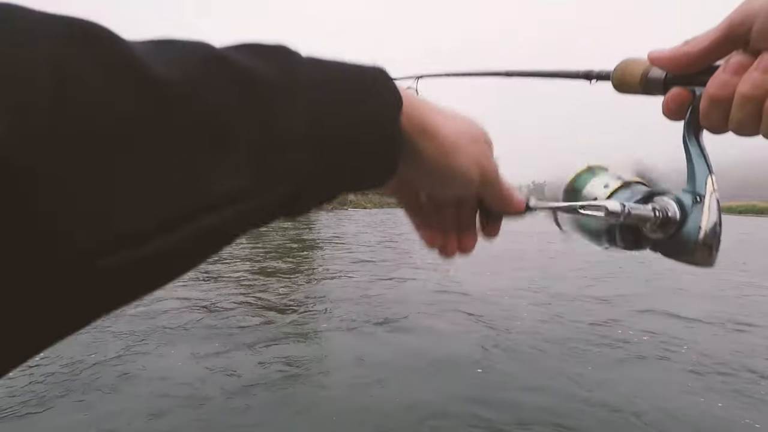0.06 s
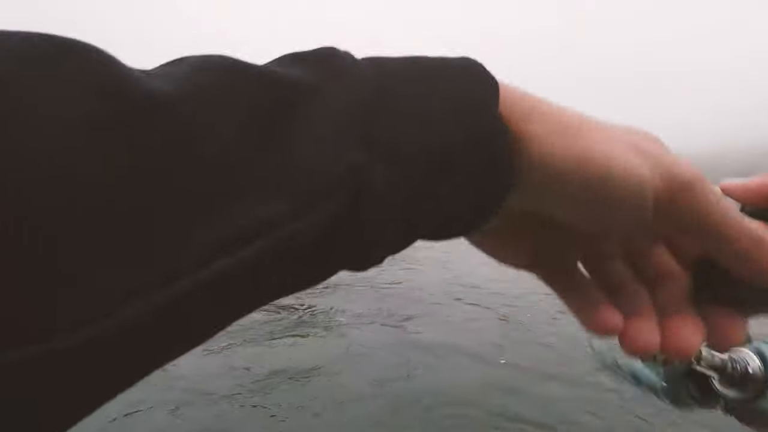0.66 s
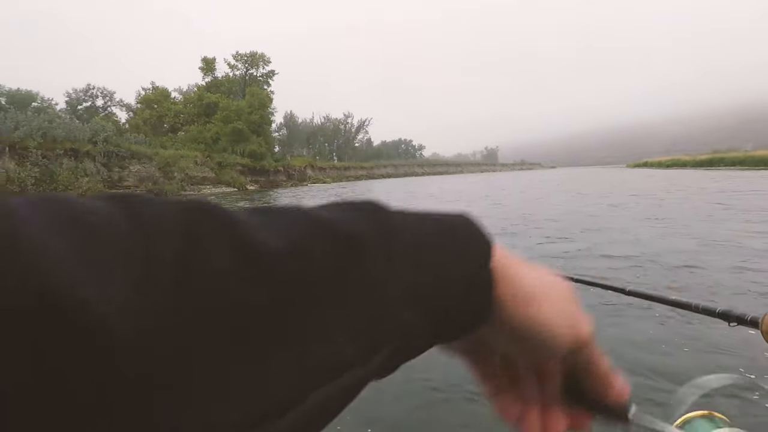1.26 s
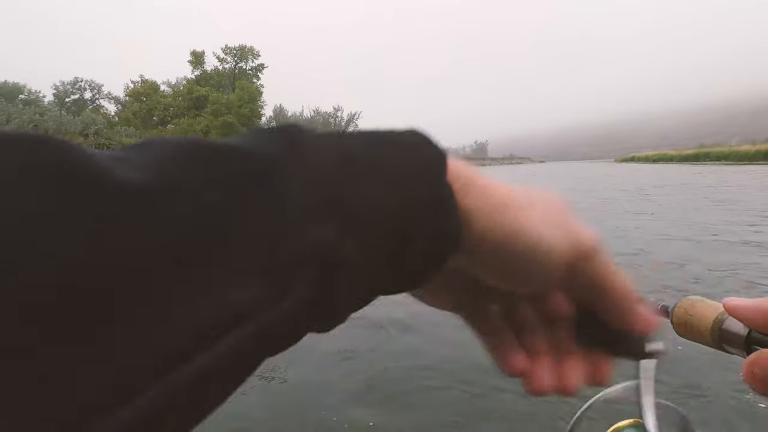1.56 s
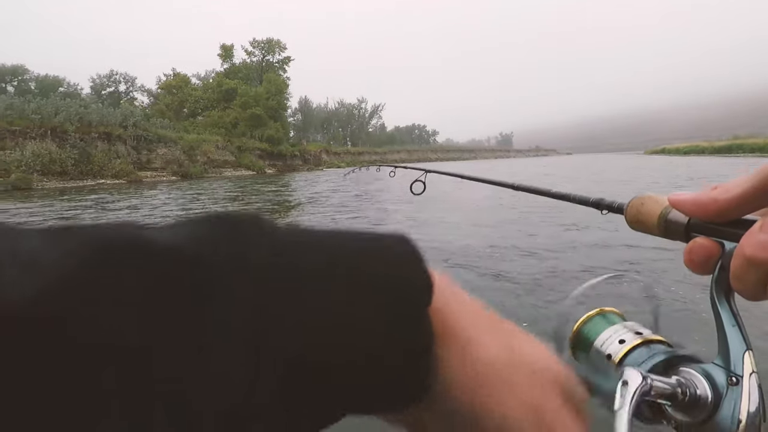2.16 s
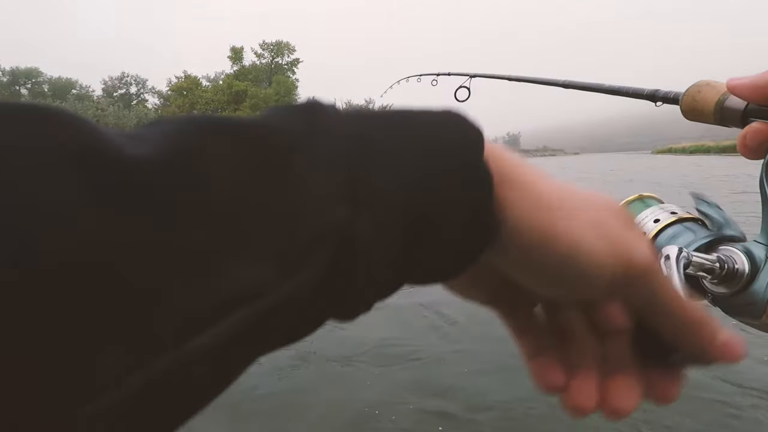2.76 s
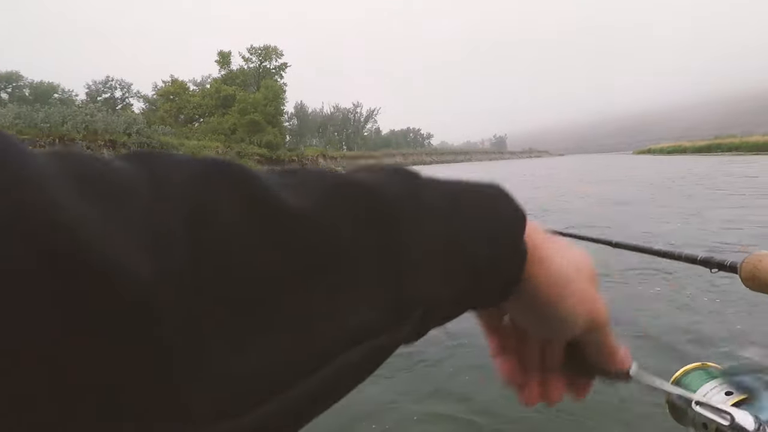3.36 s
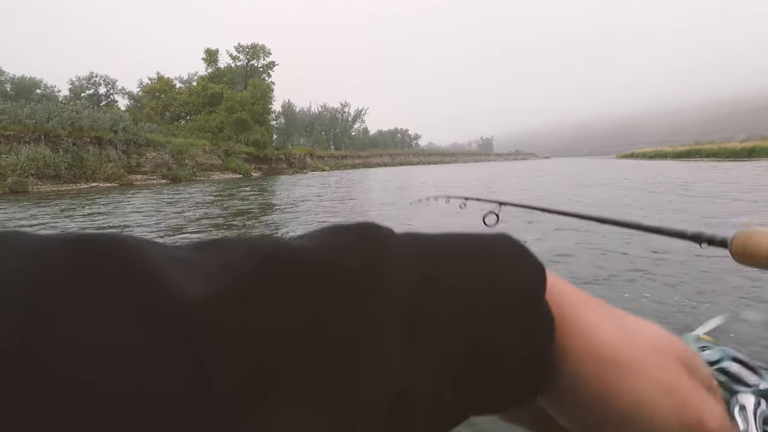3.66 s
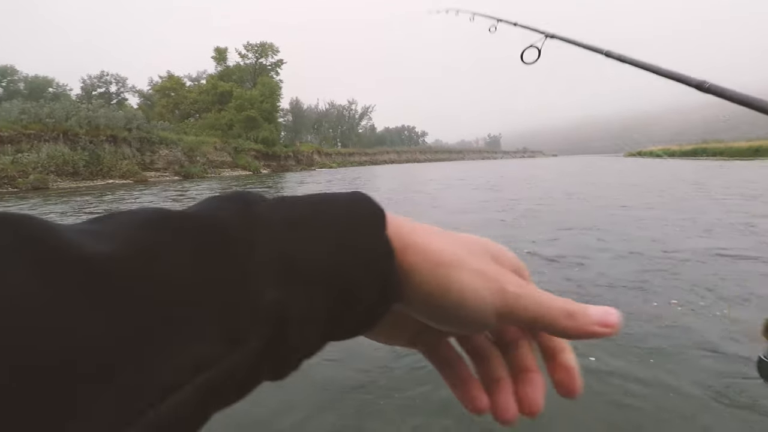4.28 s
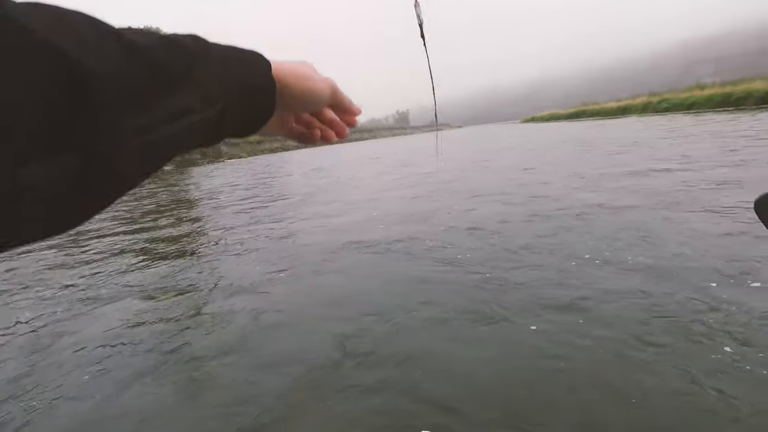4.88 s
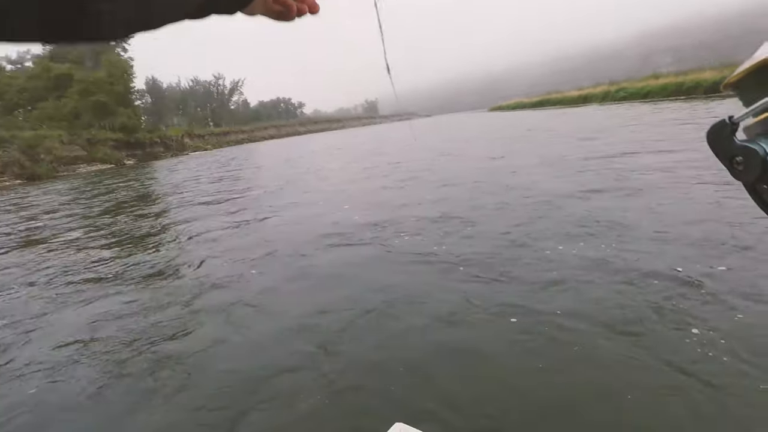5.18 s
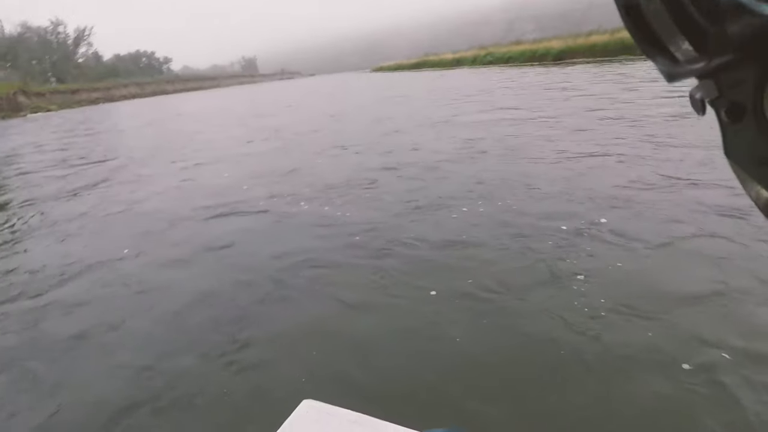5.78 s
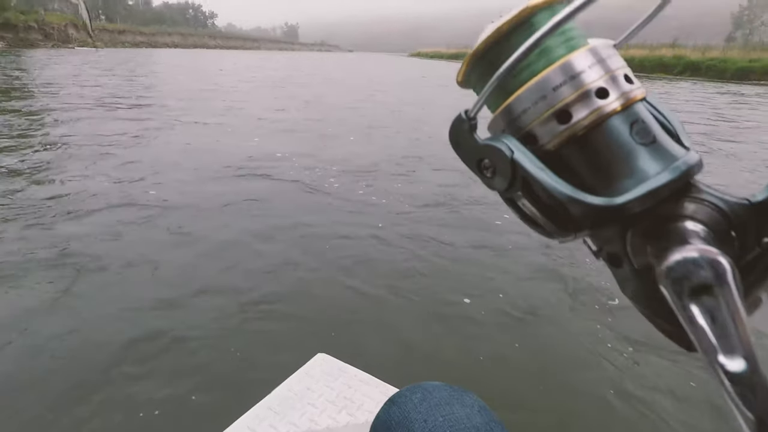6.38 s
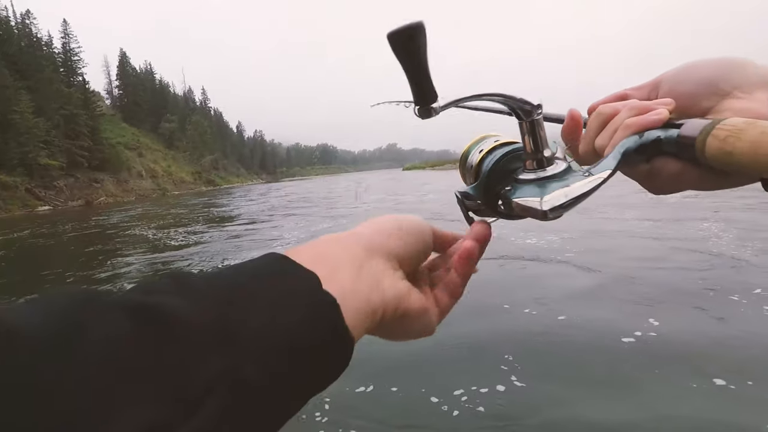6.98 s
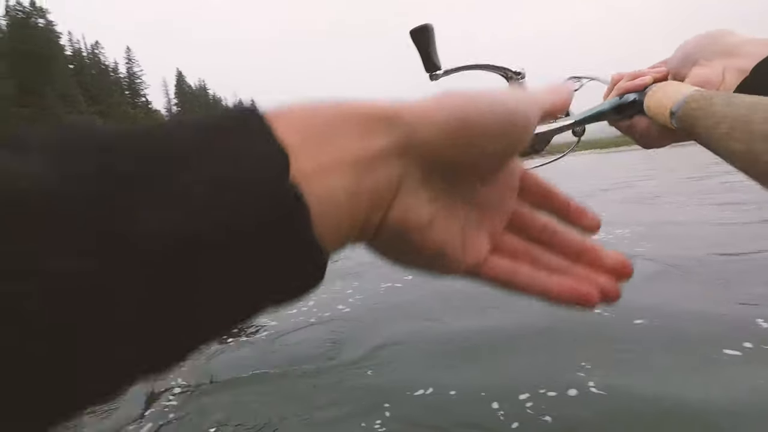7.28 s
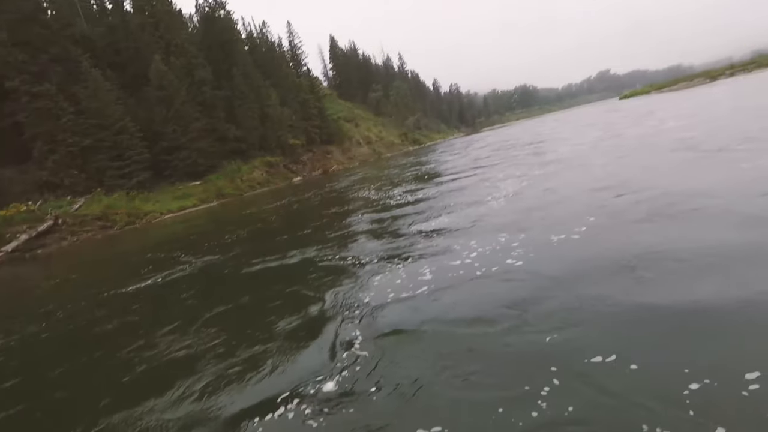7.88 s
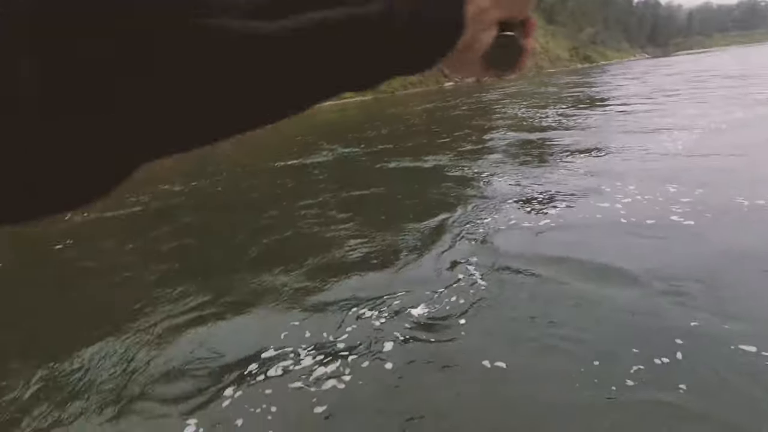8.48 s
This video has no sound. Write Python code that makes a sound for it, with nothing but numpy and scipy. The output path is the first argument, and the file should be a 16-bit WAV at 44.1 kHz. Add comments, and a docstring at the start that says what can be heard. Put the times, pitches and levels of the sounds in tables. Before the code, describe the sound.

Heard close from an angler's chest on a river, a spinning reel winds in soft surges over a slow motor hum, hollow water slaps and wind. The winding stops with a tiny squeak, and cloth scrapes and bumps the microphone while a faint bird calls. After a sudden change to quieter drifting without the motor, there is a sharp metallic snap, then a quick swish with fizzing line and a dull knock.

```python
"""A slow motor drones through the hull of a small fishing boat and speeds up a little, heard from a camera
worn on the angler's chest. Water booms and slaps on the hull, wind buffets the microphones and a far bird
whistles. A spinning reel whirrs turn by turn while a jacket rubs and taps the camera. In a second scene,
in mono, the boat drifts: the bail snaps shut, the rod swishes in a cast and the arm knocks the camera."""
import sys
import numpy as np
from scipy import signal
from scipy.fft import rfft, irfft
from scipy.io import wavfile
from scipy.ndimage import uniform_filter1d

SR = 44100
rng = np.random.default_rng(int(sys.argv[2]) if len(sys.argv) > 2 else 0)


def bounce(signal):
    """Save signal as a 16-bit WAV file at the path given by the first command-line argument."""
    frames = np.transpose(np.atleast_2d(signal))
    limited = np.clip(frames, -1, 1)
    pcm = np.round(limited * 32767).astype(np.int16)
    wavfile.write(sys.argv[1], SR, pcm)


N = 381024
TIME = np.arange(N) / SR
DRIFT_START_S = 6.7485  # the second scene begins


def amp(db):
    """Decibels to gain."""
    return 10 ** (np.asarray(db) / 20)


def unit(x):
    """Scale to rms 1."""
    return x / np.sqrt(np.mean(x ** 2))


def curve(points):
    """An automation line through (time, value) points."""
    return np.interp(TIME, *np.transpose(points))


def gate(start, end, fade):
    """Open between two times, with sloping edges."""
    return np.clip(np.minimum(TIME - start, end - TIME) / fade + .5, 0, 1)


def swell(centre_s, half_s):
    """A smooth rise and fall around a time."""
    return np.exp(-((TIME - centre_s) / half_s) ** 2)


def wander(rate_hz):
    """A random modulator, rms 1."""
    step = max(int(SR / rate_hz), 1)
    held = np.repeat(rng.standard_normal(N // step + 2), step)
    return unit(uniform_filter1d(held, step)[:N])


def grains(per_second, spread_db, decay_s):
    """Envelope of a stream of tiny random ticks, rms 1."""
    ticks = (rng.random(N) < per_second / SR) * amp(spread_db * rng.uniform(-1.1, 1, N))
    energy = signal.lfilter([1], [1, -np.exp(-2 / (decay_s * SR))], ticks ** 2 + 1e-12)
    return unit(np.sqrt(energy))


def cut(x, hz, kind, order=3):
    """A low-pass or high-pass."""
    return signal.sosfilt(signal.butter(order, hz, kind, fs=SR, output="sos"), x)


def resonate(x, hz, width):
    """One resonance, gain 1 at its centre."""
    return signal.lfilter(*signal.iirpeak(hz, hz / width, fs=SR), x)


def band(x, hz, width):
    """The same resonance twice, for steeper skirts."""
    return resonate(resonate(x, hz, width), hz, width)


def ring(hz, t60, t):
    """A struck mode."""
    return np.sin(2 * np.pi * hz * t) * np.exp(-np.log(1000) * t / t60)


def add(out, start, sound):
    """Mix a short sound in at a time in seconds."""
    i = int(max(start, 0) * SR)
    part = out[..., i:i + sound.shape[-1]]
    part += sound[..., :part.shape[-1]]


def pan_right(db):
    """Stereo gains that put the right side this far above the left."""
    return amp(np.array([[-db], [db]]) / 2)


# Stereo image of the noise layers. Each row: frequency in Hz, left-right correlation.
STEREO_IMAGE = [(30, 0.11), (70, 0.18), (130, 1), (220, 0.82), (450, 0.31), (590, -0.13), (900, -0.52),
                (1800, -0.21), (2200, -0.14), (3800, 0.67), (5000, .1), (6200, 0.46), (7800, -.4),
                (9500, 0.012)]


def noise(spectrum):
    """Coloured stereo noise whose mid has rms 1, dying away below the spectrum's lowest point."""
    hz = np.arange(N // 2 + 1) * SR / N

    def across_spectrum(points):
        point_hz, value = np.transpose(points)
        return np.interp(np.log(hz + 1), np.log(point_hz), value)

    gain = amp(across_spectrum(spectrum)) * np.minimum(hz / spectrum[0][0], 1) ** 4
    alike = np.clip(across_spectrum(STEREO_IMAGE), -.95, .99)
    mid = irfft(rfft(rng.standard_normal(N)) * gain, N)
    side = irfft(rfft(rng.standard_normal(N)) * gain * np.sqrt((1 - alike) / (1 + alike)), N)
    return np.array([mid + side, mid - side]) / np.std(mid)


# Water colour, under way and adrift. Each row: frequency in Hz, relative level in dB.
FLOW_EQ = [(200, -11.5), (260, -5), (330, -8.5), (450, -12.5), (600, -15.5), (850, -19.5), (1400, -25.5),
           (2100, -29), (2800, -33.5), (3900, -36), (4900, -40.5), (6000, -31.5), (7300, -38), (9500, -38),
           (11200, -41), (13200, -52), (15000, -67.5)]
DRIFT_EQ = [(45, -8), (75, 4.5), (110, -2), (150, 0.5), (200, -11), (260, -15.5), (400, -22), (680, -27),
            (1300, -35), (2200, -38), (3300, -47), (6000, -48.5), (9500, -50), (12000, -53), (15000, -81)]
# Fader for the water adrift. Each row: time in seconds, relative level in dB.
DRIFT_FADER = [(6.77, -49), (6.838, -47.5), (7.232, -49), (7.468, -46), (7.854, -49), (8.126, -46.5),
               (8.4, -45.5)]


def river(flow_db=-45.5, drift_gain_db=18, ripple_db=0.87):
    """A rippling bed of flowing water, deeper in tone beside the drifting boat."""
    running = gate(-1, DRIFT_START_S, 0.0012)
    flow = noise(FLOW_EQ) * amp(flow_db) * running
    drift = noise(DRIFT_EQ) * amp(curve(DRIFT_FADER) + drift_gain_db) * (1 - running)
    return (flow + drift) * amp(ripple_db * wander(18))


# Colour of the wind rumble. Each row: frequency in Hz, relative level in dB.
WIND_EQ = [(8, -18), (18, -6.5), (30, -1), (45, -13), (70, -12), (110, -23), (300, -41), (900, -77)]
# Buffets as the body moves. Each row: centre in seconds, half length in seconds, relative level in dB.
BUFFETS = [(5.85, 0.098, -22.5), (6.113, 0.08, -18), (6.716, 0.031, -18), (7.508, 0.059, -19),
           (8.363, 0.082, -20.5), (8.587, 0.12, -12)]


def wind(running_db=-27, adrift_db=-29.5, trim_db=-1):
    """Air rumbles on the microphones: a steady draught that swells with larger moves of the body."""
    draught = amp(np.where(TIME < DRIFT_START_S, running_db, adrift_db))
    buffet_power = sum(amp(db) ** 2 * swell(centre, half) for centre, half, db in BUFFETS)
    return noise(WIND_EQ) * np.sqrt(draught ** 2 + buffet_power) * amp(trim_db) * pan_right(4)


# Bird calls. Each row: start and length in seconds, first and last pitch in Hz, level in dB.
BIRD_CALLS = [(1.62, 0.24, 8080, 7500, -53), (2.17, 0.15, 8350, 7650, -60), (3.35, .27, 8130, 7400, -49),
              (4.332, 0.22, 7900, 7360, -45.5), (5.3, 0.28, 8350, 7520, -54.5),
              (6.52, 0.25, 8050, 7434, -55)]


def bird(late_swell=1.25, quaver_hz=75, flutter_db=2, left_gain=-0.43):
    """Thin falling whistles from the bank swell late; the left side is weaker and opposite in phase."""
    out, quaver = np.zeros(N), wander(900)
    for start, length, first_hz, last_hz, db in BIRD_CALLS:
        progress = np.linspace(0, 1, int(length * SR))
        glide = first_hz + (last_hz - first_hz) * progress
        hz = glide + quaver_hz * quaver[int(start * SR):][:len(progress)]
        envelope = np.abs(np.sin(np.pi * progress ** late_swell)) ** 0.7
        add(out, start, amp(db) * envelope * np.sin(2 * np.pi * np.cumsum(hz) / SR))
    return out * amp(flutter_db * wander(36)) * np.array([[left_gain], [1]])


def sleeve(start_s=0.42, fade_s=0.2, level_db=-48):
    """The sleeve brushes the chest once with a hollow whisper as the arm comes down."""
    whisper = unit(band(rng.standard_normal((2, N)), hz=960, width=450))
    envelope = gate(start_s, 9, .015) * np.exp(-np.maximum(TIME - start_s, 0) / fade_s)
    return whisper * amp(level_db) * envelope


# Camera shell modes. Each row: centre and width in Hz, gain in dB when pushed, gain in dB when twisted.
HOUSING_MODES = [(300, 384, -3, -9), (531, 187, 2, 3.5), (590, 180, -15, 5.5), (748, 90, -7, -3),
                 (995, 150, -34, -2), (1210, 320, -11, -18.5), (1450, 260, -23.5, -12),
                 (1910, 820, -17.5, -16.5), (2246, 710, -17.5, -12.5), (3500, 1500, -30, -55),
                 (6070, 1900, -31, -27), (8240, 2000, -36, -41)]


def housing(force, twist):
    """A push on the camera's housing moves both microphones alike; a twist moves them oppositely."""
    mid = side = 0
    for k, (hz, width, push_db, twist_db) in enumerate(HOUSING_MODES):
        pushed, twisted = (-1) ** k * band(np.array([force, twist]), hz, width)  # polarity alternates
        mid += amp(push_db) * pushed
        side += amp(twist_db) * twisted
    return np.array([mid + side, mid - side])


# Cloth strokes. Each row: start, length and rise in seconds, relative level in dB, rasp offset in dB.
CLOTH_STROKES = [(0.45, 0.1, 0.031, -48, -7), (0.735, .09, 0.044, -41.5, -3), (0.85, 0.083, .05, -41, 0),
                 (1.013, 0.11, 0.079, -42, 0), (1.175, .08, 0.033, -42.5, 3), (4.243, .25, 0.13, -37, -6),
                 (4.564, 0.066, 0.023, -40.5, -1), (4.682, 0.3, .06, -44.5, 0.5),
                 (4.952, 0.21, 0.057, -39, -1.5), (5.151, .37, 0.12, -40.5, 3.5),
                 (5.526, 0.096, 0.038, -35.5, 2.5), (5.608, 0.11, 0.036, -35, 5.5),
                 (5.967, 0.066, 0.044, -39.5, -0.5)]


def jacket(trim_db=1, contact_db=-46, release_s=0.02, grain_db=2, catch_db=1, rasp_hz=1600):
    """Cloth catches and slips on the housing in dense grains and drags on the mount; some strokes rasp."""
    rub = rasp = amp(contact_db) * gate(4.7, 6.1, .03)  # light contact while the arm is raised
    for start, length, rise, db, rasp_db in CLOTH_STROKES:
        release = np.exp(-np.maximum(TIME - start - length, 0) / release_s)
        press = np.clip((TIME - start) / rise, 0, 1) * release
        rub = np.maximum(rub, amp(db) * press)
        rasp = np.maximum(rasp, amp(db + rasp_db) * press)
    slips = rng.standard_normal((2, N)) * amp(grain_db * wander(350) + catch_db * wander(40))
    drag = amp(31) * rub ** 2 * unit(band(slips[0], hz=235, width=70))  # favours the firm strokes
    shell = unit(housing(*slips))
    return (cut(shell, rasp_hz, "low") * rub + cut(shell, rasp_hz, "high") * rasp + drag) * amp(trim_db)


# Taps on the camera. Each row: time in seconds, then relative levels in dB of body, tick and thud.
CAMERA_TAPS = [(0.202, -30, -46, -32), (0.572, -30.5, -57, -23), (0.83, -50, -42, -50),
               (0.88, -34, -39, -31), (0.994, -38, -40, -29), (1.062, -33, -42, -32),
               (1.217, -40, -38, -43), (1.514, -42, -44.5, -35), (1.965, -39, -41, -39),
               (2.144, -35, -52, -33), (2.164, -36, -45, -36), (3.262, -55, -38, -55),
               (3.908, -52, -52, -25), (4.105, -39.5, -39.5, -23), (4.222, -40, -35.5, -38),
               (4.252, -45, -45, -46), (4.35, -37, -45, -37), (4.418, -32, -45, -36),
               (4.719, -28.5, -47, -31), (4.789, -26, -41, -29), (4.997, -37, -40, -34),
               (5.243, -23, -37.5, -34), (5.382, -42, -50, -32), (5.587, -38, -38, -38),
               (5.739, -46, -32.5, -45)]


def taps(body_gain_db=24, tick_gain_db=19, thud_gain_db=14, push_s=0.00033, scrape_s=0.0043):
    """Each tap is a soft push and a brief scrape on the housing, with a dull thud from the mount."""
    force, mount, t = np.zeros((2, N)), np.zeros(N), TIME[:SR // 25]
    push = t / push_s * np.exp(-t / push_s)
    for time, body_db, tick_db, thud_db in CAMERA_TAPS:
        grit = unit(resonate(rng.standard_normal((2, len(t))), hz=1400, width=1300))
        scrape = grit * np.exp(-t / scrape_s)
        onset = time + 0.0011
        add(force, onset, amp(body_db + body_gain_db) * push + amp(tick_db + tick_gain_db) * scrape)
        add(mount, onset, amp(thud_db + thud_gain_db) * push)
    shell = housing(force[0], twist=amp(-2) * force[1])
    cushioned = cut(shell, 2600, "low", order=4)  # cloth softens every tap
    return cushioned + resonate(mount, hz=280, width=140)


# Sub thumps, mostly on the crank's downstrokes. Each row: centre in seconds, pitch in Hz, level in dB.
ARM_SWAYS = [(0.661, 36, -21), (0.899, 28, -24), (1.39, 29, -18), (2.08, 31, -24), (2.75, 34, -18.5),
             (2.991, 27, -21), (3.429, 28, -15), (4.15, 27, -22), (5.02, 32.4, -22)]


def arm_sway(half_s=0.047):
    """The working arm sways the camera on the chest in soft, deep thumps."""
    thumps = sum(amp(db) * swell(centre, half_s) * np.sin(2 * np.pi * hz * (TIME - centre))
                 for centre, hz, db in ARM_SWAYS)
    return thumps * pan_right(2)


# Dry clicks of reel and line guides. Each row: start in seconds, centre and width in Hz, level in dB.
TACKLE_CLICKS = [(0.2405, 5800, 1800, -38), (1.513, 5500, 4000, -47), (1.54, 6300, 2000, -38),
                 (2.807, 4800, 3500, -40), (3.205, 4200, 1900, -34), (3.2627, 4030, 5000, -39),
                 (3.5913, 4200, 3000, -43), (5.245, 7500, 4000, -45), (5.741, 1840, 1000, -30),
                 (5.7405, 8750, 3000, -40), (5.912, 7300, 1500, -45), (6.26, 3800, 900, -43),
                 (7.832, 4000, 3000, -48)]


def tackle_clicks(attack_s=0.00034, decay_s=0.0023):
    """Small parts of the tackle tick, each with its own colour and hardly any ring."""
    out, t = np.zeros((2, N)), TIME[:SR // 50]
    envelope = (1 - np.exp(-t / attack_s)) * np.exp(-t / decay_s)
    for start, hz, width, db in TACKLE_CLICKS:
        grain = unit(band(rng.standard_normal((2, len(t))), hz, width))
        add(out, start, amp(db) * grain * envelope)
    return out


def squeak(hz, length, roughness=0.04):
    """A brief, slightly rough tone of one part slipping on another."""
    count = int(length * SR)
    jitter = unit(uniform_filter1d(rng.standard_normal(count), SR // 1000))
    pitch = hz * (1 + roughness * jitter)
    return np.sin(np.linspace(0, np.pi, count)) * np.sin(2 * np.pi * np.cumsum(pitch) / SR)


# Crank handle squeaks. Each row: start in seconds, low tone level in dB, high tone level in dB.
HANDLE_SQUEAKS = [(3.44, -60, -46), (3.486, -44, -48)]
# Bail hinge chirps. Each row: start and length in seconds, pitch in Hz, level in dB.
HINGE_SQUEAKS = [(6.912, .007, 3960, -42), (6.919, .009, 3960, -41), (6.913, .015, 1980, -44),
                 (6.931, .008, 3960, -37)]


def reel_squeaks(low_hz=946, high_hz=1630, handle_s=0.017):
    """The crank handle squeaks as the winding stops, the bail's hinge as it swings."""
    out = np.zeros(N)
    for start, low_db, high_db in HANDLE_SQUEAKS:
        add(out, start, amp(low_db) * squeak(low_hz, handle_s))
        add(out, start, amp(high_db) * squeak(high_hz, handle_s))
    for start, length, hz, db in HINGE_SQUEAKS:
        add(out, start, amp(db) * squeak(hz, length))
    return out


# Gear whirr, surging roughly every three quarters of a second. Each row: time in seconds, level in dB.
GEAR_FADER = [(0.05, -50.5), (0.2, -55), (0.35, -62), (0.6, -58.5), (0.7, -53.5), (0.83, -54), (0.97, -62),
              (1.28, -52), (1.37, -66), (1.48, -53), (1.65, -50.5), (1.73, -59), (1.85, -54.5),
              (2.0, -55.5), (2.12, -57.5), (2.25, -52.5), (2.52, -52.5), (2.65, -64), (2.95, -57.5),
              (3.1, -58), (3.25, -57), (3.4, -62), (3.5, -65)]
# Gear resonance, following the hand's pace. Each row: time in seconds, pitch in Hz.
GEAR_BEND = [(0, 1690), (.13, 1740), (.55, 1739), (.66, 1598), (.73, 1700), (.82, 1653), (1.25, 1723),
             (1.45, 1671), (1.55, 1701), (1.7, 1653), (2.0, 1680), (2.25, 1654), (2.55, 1655), (3.0, 1702),
             (3.5, 1628)]
# Wet line running onto the spool. Each row: time in seconds, relative level in dB.
LINE_FADER = [(0, -58), (.12, -59), (.25, -59), (.3, -66), (.4, -65), (.45, -58), (.63, -59), (.7, -62),
              (1.05, -61.5), (1.2, -63), (1.24, -57.5), (1.33, -56.5), (1.38, -62), (1.5, -59),
              (1.68, -56.5), (1.73, -57), (1.8, -57), (1.95, -59), (2.25, -60.5), (2.35, -66), (2.9, -64),
              (3.0, -59), (3.15, -59.5), (3.4, -61.5), (3.55, -65)]
# Colours of line hiss and roller rattle. Each row: frequency in Hz, relative level in dB.
LINE_EQ = [(500, -5.5), (900, 2), (1300, 2.5), (2500, -2.5), (3900, 2), (4900, -3), (6600, -1.5),
           (7600, -1.5), (8400, -18), (11000, -20.5), (15000, -41.5)]
ROLLER_EQ = [(2800, -25), (3800, -8), (4900, -19), (5700, -1), (6600, -1.5), (7200, -5), (8200, -25),
             (12000, -39.5)]


def reel(end_s=3.53, gear_width_hz=160, tooth_grain_db=3, hiss_db=-2, hiss_grain_db=2.5, roller_db=-1):
    """The gears whirr in one bending resonance; wet line hisses and sets the roller rattling."""
    pitch = curve(GEAR_BEND)
    teeth = rng.standard_normal((2, N)) * amp(tooth_grain_db * wander(120))
    steady_whirr = unit(band(teeth, pitch.mean(), gear_width_hz))
    playhead = np.cumsum(pitch / pitch.mean())  # varispeed bends the resonance
    whirr = np.array([np.interp(playhead, np.arange(N), channel) for channel in steady_whirr])
    hiss = noise(LINE_EQ) * amp(hiss_db + hiss_grain_db * wander(140))
    rattle = noise(ROLLER_EQ) * grains(190, spread_db=8, decay_s=.0016) * amp(roller_db)
    winding = whirr * amp(curve(GEAR_FADER)) + (hiss + rattle) * amp(curve(LINE_FADER))
    return winding * gate(-1, end_s, 0.21)


# The bail shutting and bouncing. Each row: start in seconds, relative ring and crack levels in dB.
BAIL_HITS = [(6.8763, -46, -54), (6.9263, -12.5, -20), (6.9303, -38, -34), (6.9365, -24, -36)]
# Modes of wire and rotor. Each row: pitch in Hz, relative level in dB, seconds to fall by 60 dB.
BAIL_MODES = [(480, -12, .012), (820, -12, .012), (1150, -15, 0.02), (1816, -20, 0.04), (1963, -5.5, 0.045),
              (2065, -17, .04), (2500, -9, 0.0098), (3500, -16, 0.016), (3962, -23, 0.045),
              (4660, -3, 0.011), (5760, -2, 0.008), (6050, -5, .015), (7040, -25, 0.045), (9100, -18, .014)]
# Colour of the crack. Each row: frequency in Hz, relative level in dB.
CRACK_EQ = [(600, -7), (2000, -1), (2900, -7), (4600, 0), (6200, 3), (7500, -13), (9000, -9), (12000, -19),
            (15000, -19)]


def bail(ring_gain_db=-2, attack_s=.0006):
    """The sprung wire cracks onto its stop, bounces and rings with the rotor."""
    wire, contact, t = np.zeros(N), np.zeros(N), TIME[:SR // 8]
    modes = (1 - np.exp(-t / attack_s)) * sum(amp(db) * ring(hz, t60, t) for hz, db, t60 in BAIL_MODES)
    spike = np.exp(-((t - .0009) / .0008) ** 2)
    tail = .28 * (1 - np.exp(-t / .001)) * np.exp(-t / .004)
    for start, ring_db, crack_db in BAIL_HITS:
        add(wire, start, amp(ring_db + ring_gain_db) * modes)
        add(contact, start, amp(crack_db) * (spike + tail))
    return wire + noise(CRACK_EQ) * contact


# Faders for the cast's swish and the line's fizz. Each row: time in seconds, relative level in dB.
SWISH_FADER = [(8.2, -71), (8.32, -49), (8.39, -63), (8.435, -51), (8.458, -46), (8.471, -37.5),
               (8.481, -36.5), (8.5, -40), (8.512, -52), (8.55, -46), (8.58, -61), (8.64, -77.5)]
FIZZ_FADER = [(8.3, -66), (8.44, -66), (8.449, -45), (8.458, -42), (8.472, -44), (8.48, -50), (8.5, -48),
              (8.53, -53), (8.6, -55), (8.64, -60)]
# Their colours. Each row: frequency in Hz, relative level in dB.
SWISH_EQ = [(300, 3), (700, 2.5), (1300, 0.5), (2300, 1.5), (3300, -5), (4500, -6), (6200, -10),
            (7200, -21), (9000, -16), (15000, -28)]
FIZZ_EQ = [(6500, -22), (7600, -14), (8500, 4), (10500, -5), (12000, -7), (15000, 2.5)]


def cast(flutter_db=2, fizz_gain_db=3, whirr_db=-60):
    """Sleeve and rod swish; line fizzes over the spool lip and whirrs away."""
    swish = noise(SWISH_EQ) * amp(curve(SWISH_FADER) + flutter_db * wander(200))
    coils = grains(900, spread_db=5, decay_s=.0015)
    fizz = noise(FIZZ_EQ) * coils * amp(curve(FIZZ_FADER) + fizz_gain_db)
    whirr = unit(resonate(rng.standard_normal(N), hz=4600, width=120)) * amp(whirr_db)
    return (swish + fizz) * gate(8.2, 9, 0.039) + whirr * gate(8.48, 9, .03)


# Resonances of the camera mount. Each row: centre and width in Hz, gain in dB.
MOUNT_MODES = [(167, 260, 2.5), (334, 10, -3.5), (614, 65, -2.5), (970, 150, -1)]


def arm_knock(hit_s=8.5457, force_db=-4, fall_db=1.2, gap_s=0.0029, contact_s=0.00077, softening=1.44):
    """The arm knocks the camera and chatters: four blows, ever wider apart, softer and weaker."""
    blows = np.zeros(N)
    for k in range(4):
        centre = hit_s + gap_s * (2 ** k - 1)
        half_s = contact_s * softening ** k
        pulse = signal.windows.hann(int(2 * half_s * SR) + 3)
        add(blows, centre - half_s, amp(force_db - fall_db * k) * pulse)
    return sum(amp(db) * resonate(blows, hz, width) for hz, width, db in MOUNT_MODES)


# Water slaps. Each row: start in seconds, pitch in Hz, level in dB, seconds to fall by 60 dB.
WATER_SLAPS = [(0.2, 184.3, -20.5, 0.52), (0.33, 169, -24.5, 0.3), (0.396, 159, -16, 0.15),
               (0.484, 151, -10, 0.073), (0.706, 171.3, -12.5, 0.3), (2.158, 181, -11, 0.075),
               (5.112, 143, -23, 0.38), (7.555, 201, -17, 0.075)]


def hull_slaps(attack_s=0.0015):
    """Each slap of water rings one low note in the hull."""
    out, t = np.zeros(N), TIME[:SR // 3]
    for start, hz, db, t60 in WATER_SLAPS:
        add(out, start, amp(db) * ring(hz, t60, t) * (1 - np.exp(-t / attack_s)))
    return out


# Colour of the hull's boom. Each row: frequency in Hz, relative level in dB.
HULL_EQ = [(70, -22), (108, -9.5), (140, 17.5), (165, 4), (195, 3), (240, -6.5), (400, -47)]
# Fader for the boom and the motor's ring in the hull. Each row: time in seconds, relative level in dB.
HULL_FADER = [(0.05, -26.5), (0.5, -26), (0.65, -35), (0.75, -23.5), (0.88, -29), (1.03, -27), (1.1, -28.5),
              (1.45, -29.5), (1.65, -27), (1.81, -38), (1.95, -25.5), (2.1, -29.5), (2.42, -23.5),
              (2.6, -35), (2.8, -27), (3.3, -24), (3.65, -28.5), (3.9, -23), (4.15, -30.5), (4.6, -22.5),
              (4.92, -30), (5.13, -23), (5.33, -29.5), (5.6, -28), (5.88, -35.5), (6.05, -28.5), (6.3, -27),
              (6.7, -28)]


def hull_boom(shaft_hz, cruise_hz=31.6, base_db=-33, idle_lift_db=5, adrift_db=-39, lapping_db=2):
    """The hull booms with the water, most while the motor idles, and laps softly once adrift."""
    fader_db = curve(HULL_FADER)
    idling = (cruise_hz - shaft_hz) / (cruise_hz - shaft_hz.min())
    running_db = base_db + 0.48 * (fader_db - fader_db.mean()) + idle_lift_db * idling
    running = gate(-1, DRIFT_START_S, 0.002) > 0
    return noise(HULL_EQ) * amp(np.where(running, running_db, adrift_db + lapping_db * wander(8.6)))


# Throttle, from idle to a slow cruise. Each row: time in seconds, shaft rate in Hz.
SHAFT_RATE = [(0.0, 24.8), (0.6, 24.7), (0.79, 26.2), (0.88, 27.01), (1.0, 28.7), (1.12, 30.11),
              (1.29, 31.3), (1.8, 29.8), (2.18, 29.7), (2.31, 30.4), (3.13, 30.9), (3.55, 29.7),
              (3.79, 31.2), (4.17, 30.2), (4.6, 31.6), (5.01, 29.9), (5.72, 29.9), (6.04, 31.5),
              (6.31, 30.4), (6.74, 31.1)]
# The firing note (harmonic 4), rising as the throttle opens. Each row: time in seconds, level in dB.
FIRING_FADER = [(0, -34), (.6, -30.5), (.9, -35.5), (1.1, -20.5), (1.3, -22), (1.55, -21.5), (1.72, -26.5),
                (1.82, -28.5), (1.95, -25), (2.2, -24.5), (2.65, -23.5), (2.85, -21.5), (3.3, -22.5),
                (3.6, -21.5), (3.85, -22), (4.2, -24.5), (4.6, -21.5), (4.95, -24), (5.25, -22),
                (5.55, -24), (5.85, -23), (6.1, -22.5), (6.45, -23), (6.7, -23)]
# Hull ring on harmonics 5 and 6. Each row: frequency in Hz, offset from the hull fader in dB.
HULL_RING_EQ = [(122, -6.5), (137, 13), (149, 0.5), (157, -1), (180, -14.5)]
# The weaker harmonics. Each row: frequency in Hz, level in dB.
WEAK_HARMONIC_EQ = [(25, -49), (50, -33.5), (61, -33), (75, -29.5), (91, -35), (150, -30), (175, -49),
                    (212, -51.5), (280, -58.5)]


def motor(shaft_hz, hull_hz=135, hull_width_hz=45, low_lag_s=0.0035, throb_db=0.8):
    """Harmonics of the shaft rate drone in the hull, wavering as the propeller meets uneven water."""
    levels_db = {4: curve(FIRING_FADER) + 1.4 * wander(14)}
    for k in (5, 6):
        ring_db = np.interp(k * shaft_hz, *np.transpose(HULL_RING_EQ))
        levels_db[k] = curve(HULL_FADER) + ring_db + 2.04 * wander(14)
    for k in (1, 2, 3, 7, 8):
        levels_db[k] = np.interp(k * shaft_hz, *np.transpose(WEAK_HARMONIC_EQ)) + 2 * wander(8)
    shaft_phase = 2 * np.pi * np.cumsum(shaft_hz) / SR
    drone = np.zeros(N)
    for k, db in levels_db.items():
        hz = k * shaft_hz
        lag = np.arctan(2 * (hz - hull_hz) / hull_width_hz)  # the hull answers late above its resonance
        lag += 2 * np.pi * hz * low_lag_s * (k < 4)  # the slow low waves arrive late too
        wobble_rad = np.where(hz > hull_hz, .3, .14 if k == 4 else .35)  # the firing note is steadiest
        wobble = uniform_filter1d(wobble_rad, SR // 10) * wander(28)
        drone -= np.sqrt(2) * amp(db) * np.sin(k * shaft_phase - lag + wobble)
    drone *= amp(throb_db * wander(30))
    stereo = np.array([drone, np.roll(drone, 13)])  # reaches the right microphone a moment later
    return stereo * gate(-1, DRIFT_START_S, 0.002)


def scene():
    """The boat, a little to the right, with the river, the angler and the bird around it."""
    shaft_hz = curve(SHAFT_RATE)
    boat = (hull_boom(shaft_hz) + motor(shaft_hz) + hull_slaps()) * pan_right(3)
    ambience = river() + wind()
    angler = reel() + arm_sway() + jacket() + sleeve() + taps()
    tackle = tackle_clicks() + bail() + reel_squeaks()
    return boat + ambience + angler + tackle + bird() + cast() + arm_knock()


def record(dry, fade_in_s=0.0036, dull_hz=10800, click_db=-20, top_hz=15200):
    """The microphones dull the treble; the drift opens with a click and is mono; the top is cut off."""
    out = cut(dry * np.minimum(TIME / fade_in_s, 1), dull_hz, "low", order=2)
    out = np.where(TIME < DRIFT_START_S, out, out.mean(axis=0))
    add(out, DRIFT_START_S, -amp(click_db) * np.exp(-TIME[:SR // 50] / 0.0015))
    return signal.sosfilt(signal.ellip(8, .2, 70, top_hz, fs=SR, output="sos"), out)


dry = scene()
out = record(dry)
bounce(out)
```